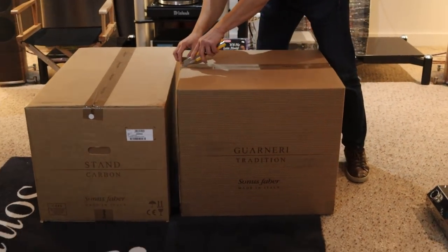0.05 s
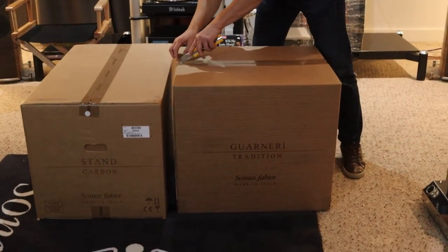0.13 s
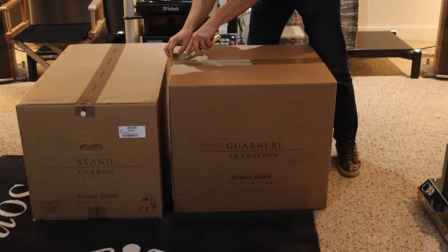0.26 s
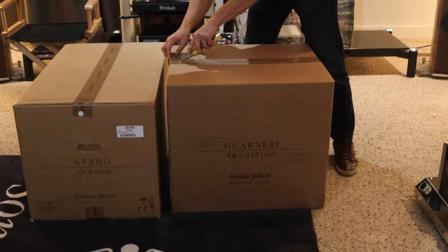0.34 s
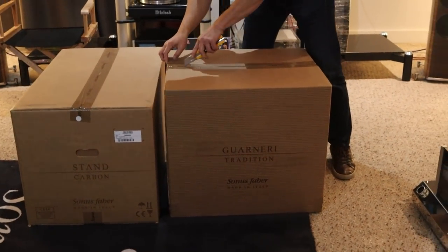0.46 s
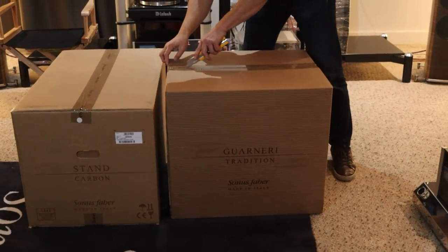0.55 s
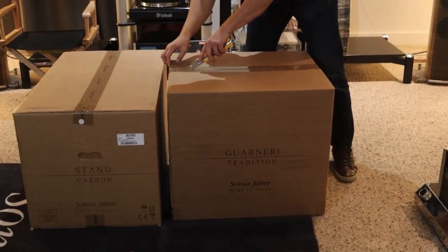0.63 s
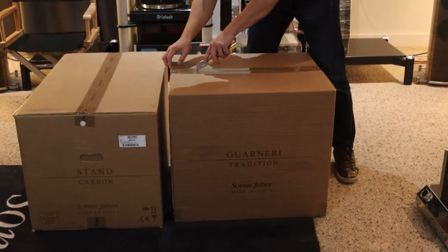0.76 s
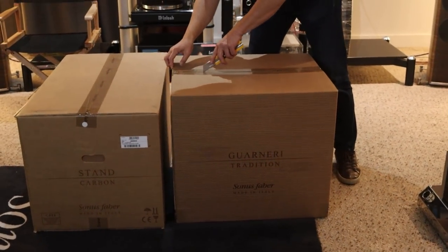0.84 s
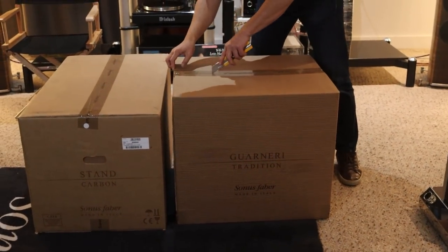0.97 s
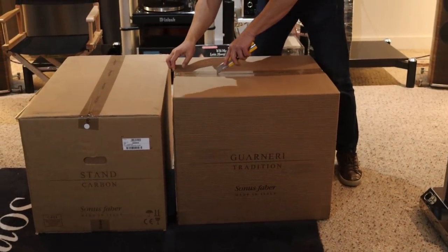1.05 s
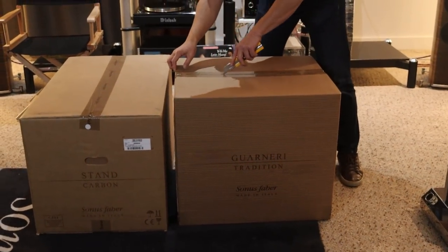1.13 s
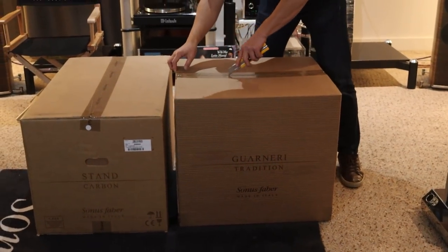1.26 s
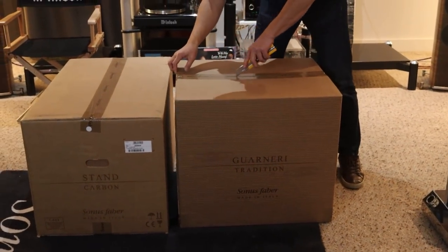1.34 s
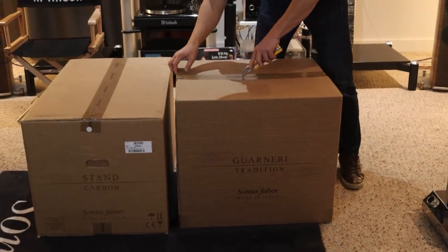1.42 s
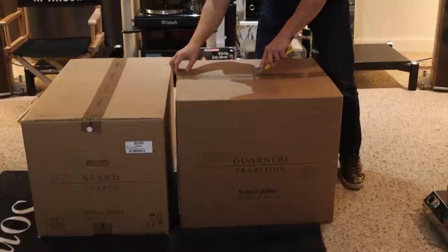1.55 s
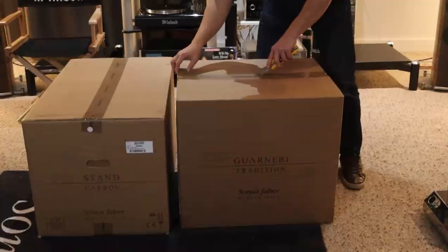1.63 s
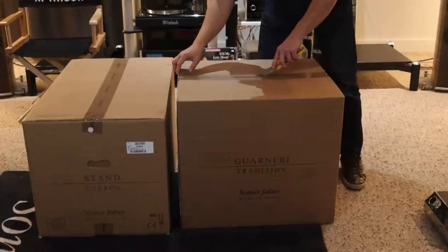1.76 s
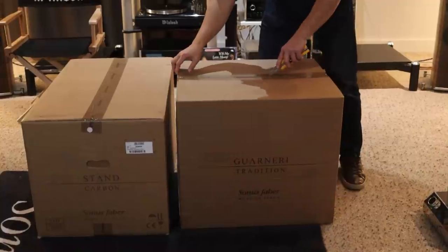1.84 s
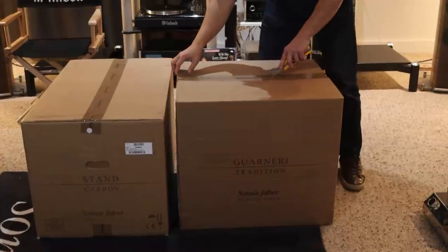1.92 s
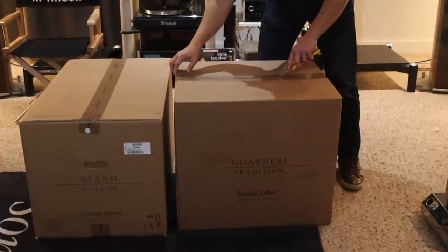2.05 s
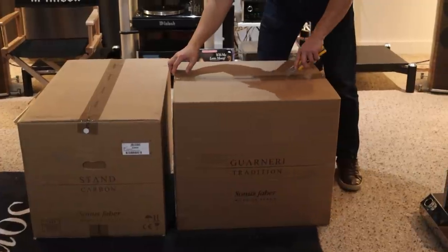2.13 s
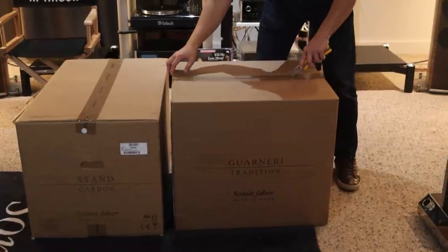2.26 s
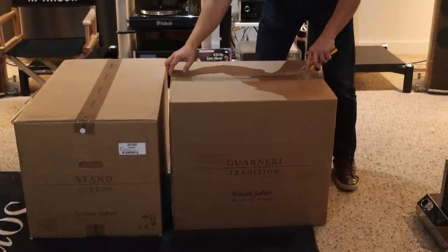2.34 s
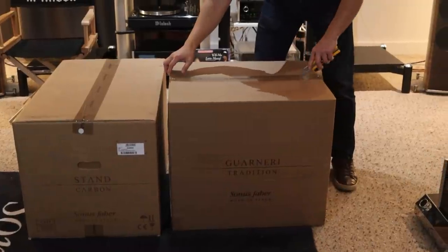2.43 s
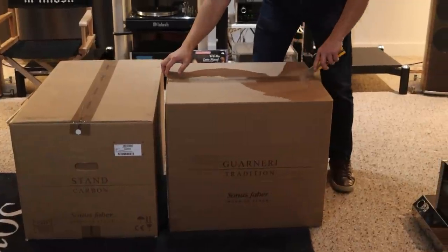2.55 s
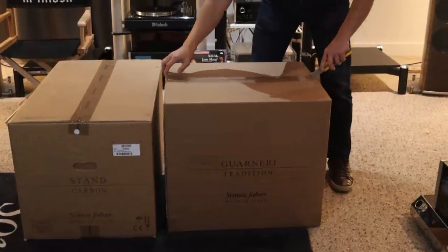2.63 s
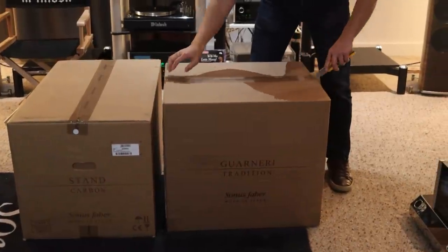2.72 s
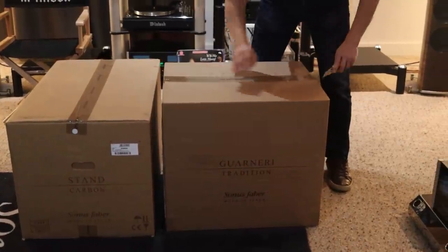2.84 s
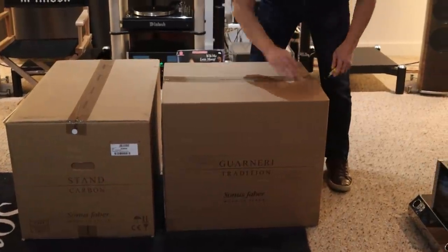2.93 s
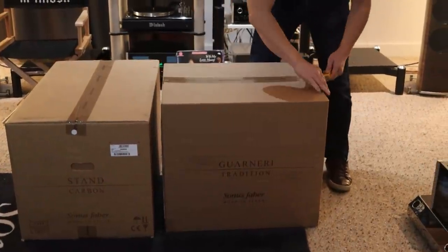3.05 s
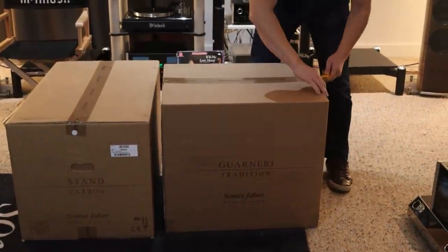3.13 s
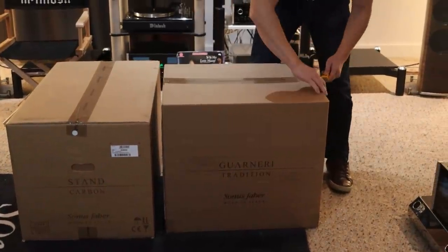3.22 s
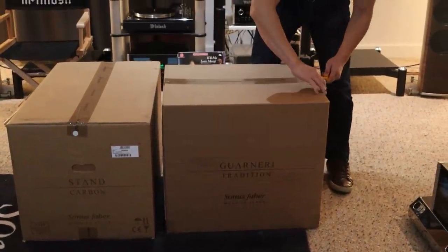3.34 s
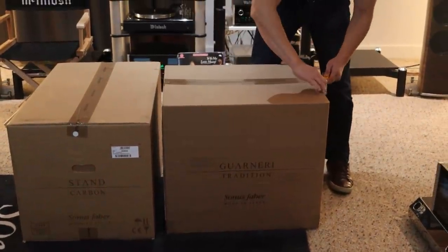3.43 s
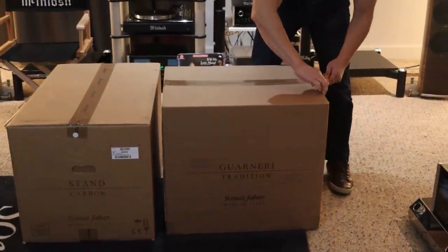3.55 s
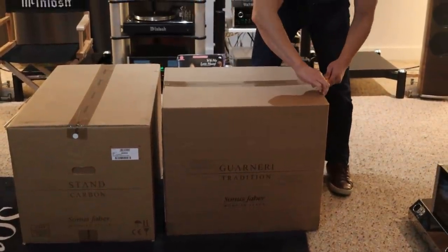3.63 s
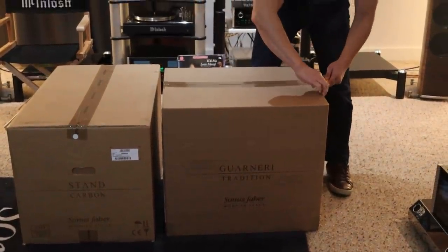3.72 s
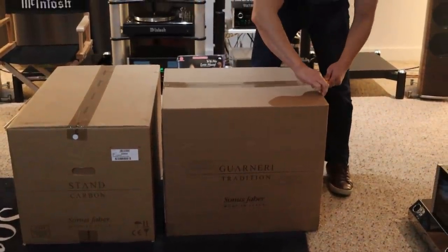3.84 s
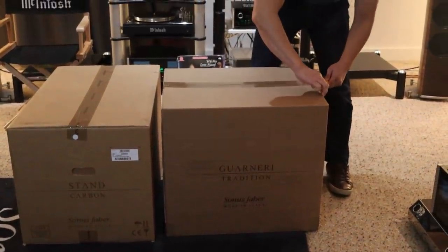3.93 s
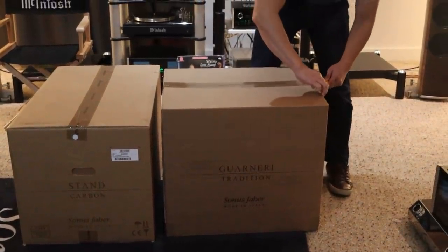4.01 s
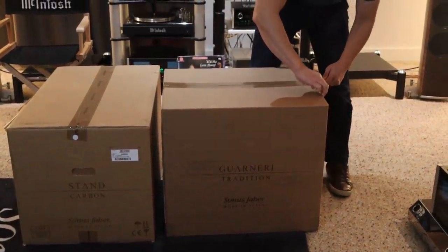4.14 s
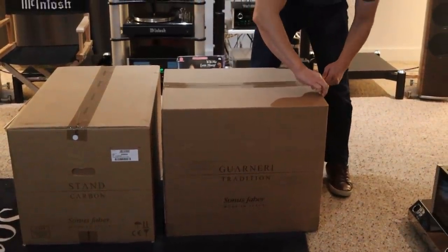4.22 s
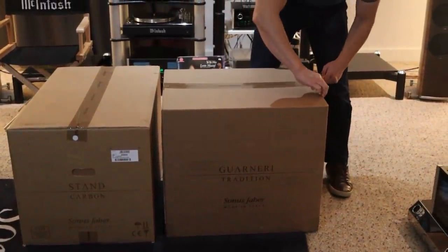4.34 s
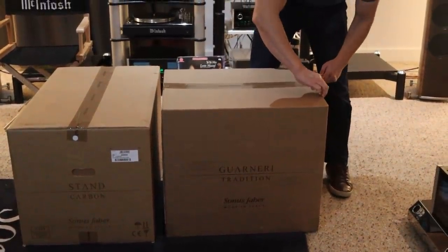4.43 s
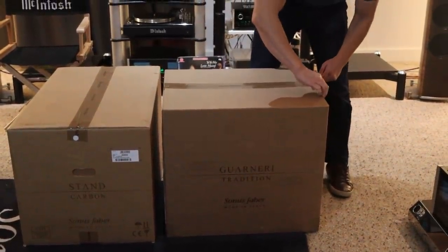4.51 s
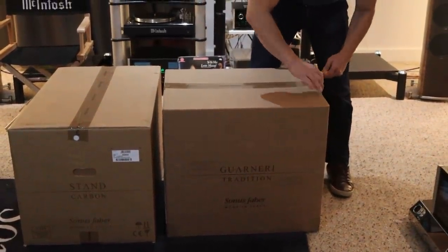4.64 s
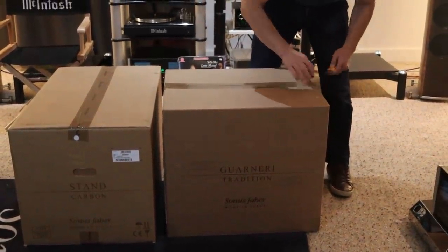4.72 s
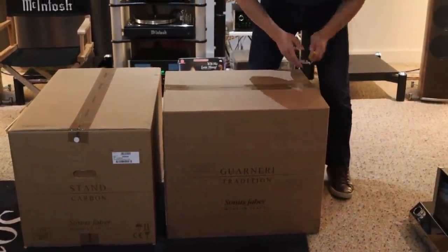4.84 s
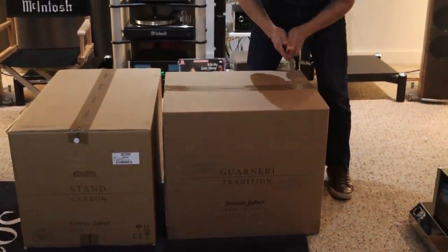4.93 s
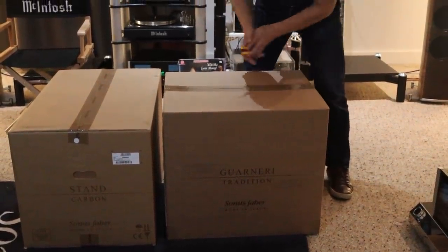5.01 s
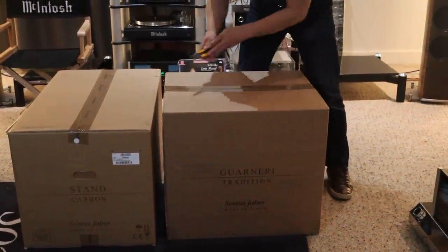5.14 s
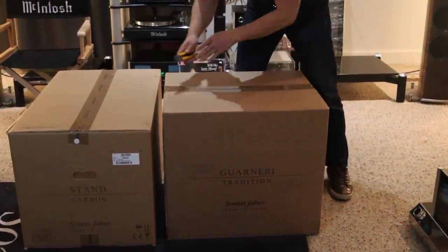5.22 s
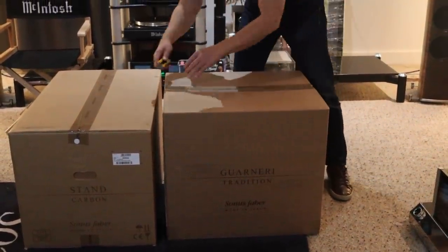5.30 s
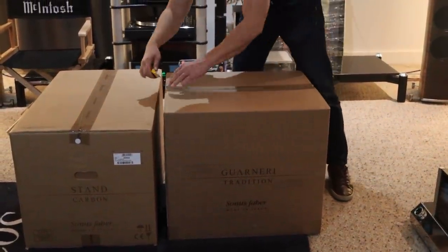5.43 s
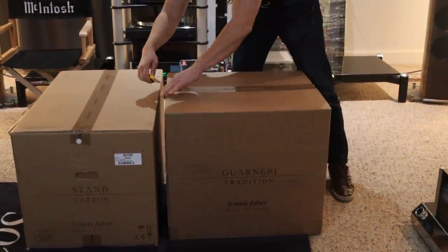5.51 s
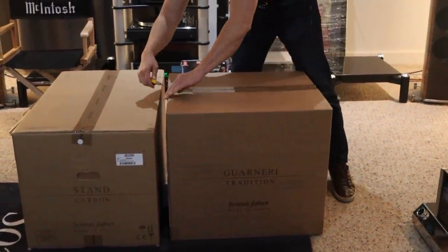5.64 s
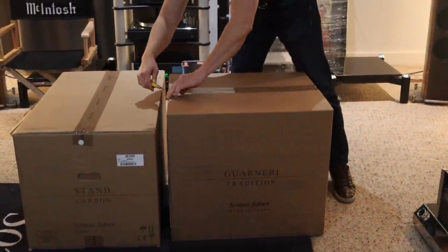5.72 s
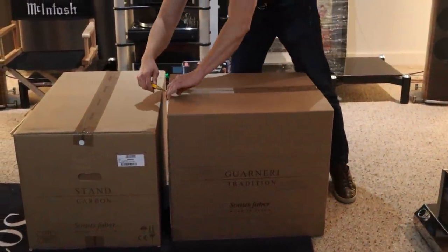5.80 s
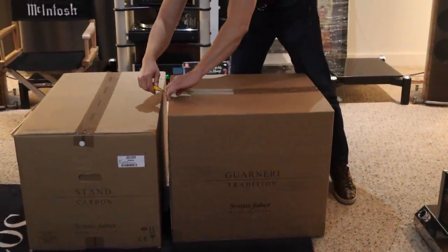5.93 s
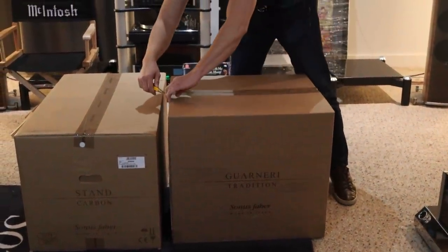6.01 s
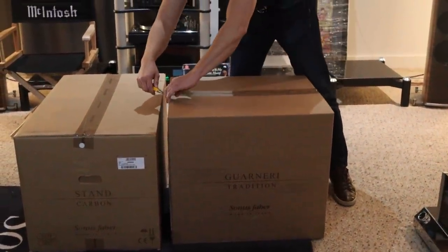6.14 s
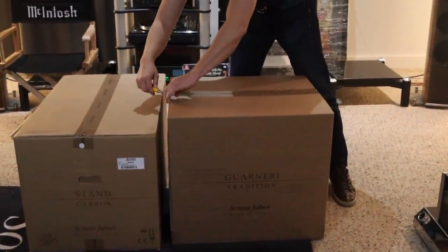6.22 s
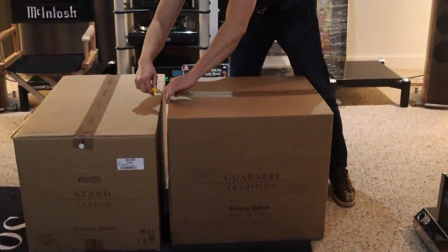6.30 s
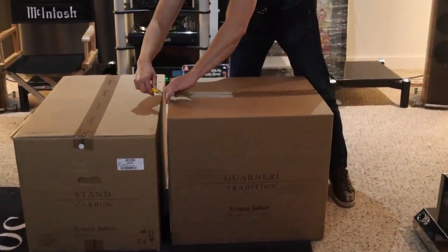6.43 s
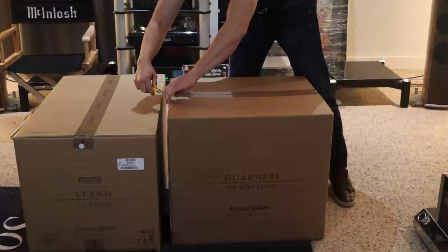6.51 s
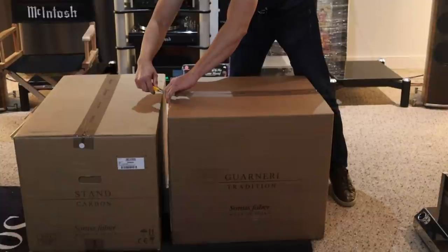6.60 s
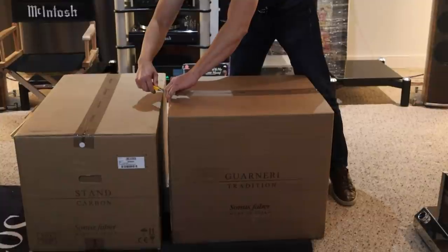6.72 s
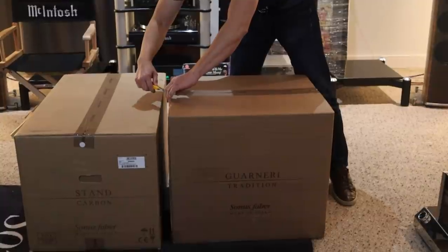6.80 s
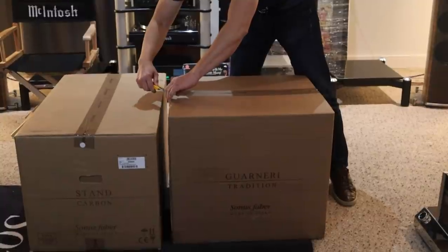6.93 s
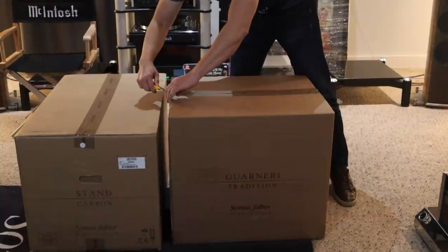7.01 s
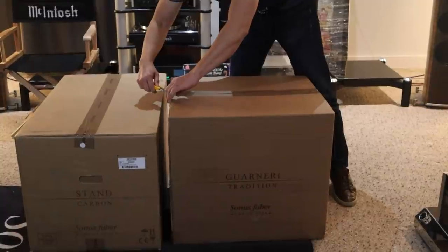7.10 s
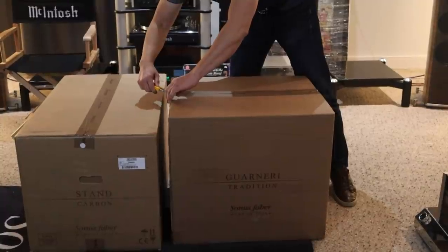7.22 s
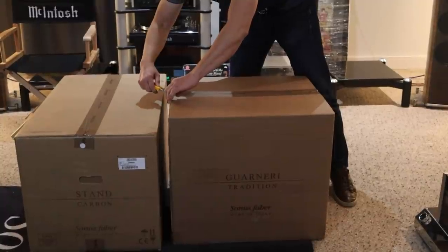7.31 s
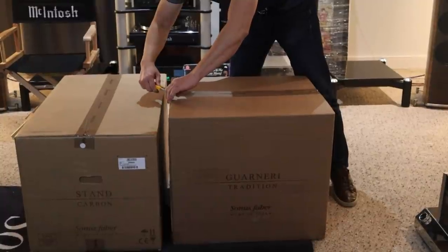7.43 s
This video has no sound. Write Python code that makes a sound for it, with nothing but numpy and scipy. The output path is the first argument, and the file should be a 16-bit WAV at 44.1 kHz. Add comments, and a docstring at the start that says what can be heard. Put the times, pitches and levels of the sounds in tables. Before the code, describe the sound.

Packing tape on a large cardboard box is cut with a scratchy knife stroke, followed by scattered snaps, pops and soft hand rubs.

```python
"""Hands rub softly over a big cardboard box, then a knife catches in its packing tape and slits it.
The blade sticks and slips along the seam, rasping and ticking, then picks at the tape on both edges.
Each slip and snap shakes the hollow box, its stiff panels, the tight tape and the blade's edge.
The top flap pops and drones under the hand; later the tape squeaks, fingers swish and the blade zips
over the rim. The room is carpeted, so echoes are short; faint air noise and mains hum lie underneath."""
import sys
import numpy as np
from scipy import signal
from scipy.fft import rfft, irfft
from scipy.io import wavfile
from scipy.ndimage import uniform_filter1d

SR = 44100
rng = np.random.default_rng(int(sys.argv[2]) if len(sys.argv) > 2 else 0)


def unload_audio(sound):
    """Save the sound as a 16-bit wav file, at the path given as the first command line argument."""
    columns = np.transpose(np.atleast_2d(sound))
    # keep every value between -1 and 1, then stretch to whole-number steps
    steps = np.round(np.clip(columns, -1, 1) * 32767)
    wavfile.write(sys.argv[1], SR, steps.astype(np.int16))


N = 328986

# Tone colour of the room's air: f/Hz, relative level/dB
AIR_COLOUR = [(30, -18), (60, -14), (90, -9), (125, 1.5), (180, -7), (260, -9), (400, -13.5), (1000, -17),
              (2000, -22.5), (5000, -23), (11500, -21.5), (12800, -15), (16000, -26)]

# A touch has a level, a depth (extra box and board, and a little extra tape) and a bite (extra treble).
# Hands slide over tape and board: loudest t/s, level/dB, depth/dB, bite/dB
HAND_RUBS = [(0.102, -55.5, -2, -27), (.185, -55, -3, -7), (.265, -61.5, -4, -32), (0.802, -65, 5, -14),
             (0.861, -56.5, 6.5, -13), (2.601, -51, -1.5, -3), (3.281, -59, -8.5, 5), (3.409, -75, 7.5, 6),
             (4.501, -45, -5, -19.5), (4.646, -46, -4, -11), (5.741, -51.5, 1, 3.5)]
# Short knife strokes: start t/s, length/s, level/dB, depth/dB, bite/dB
KNIFE_STROKES = [(0.414, 0.037, -39.5, 9, -15.5), (.46, 0.035, -44, 10, -12), (0.514, 0.092, -37.5, 4, -5),
                 (0.668, 0.018, -40.5, 6, -12), (2.439, 0.054, -42.5, 0, -5.5), (2.59, 0.042, -43, 1, -9),
                 (2.635, 0.06, -31.5, -3, -4.5), (2.729, 0.09, -43, 5, -6), (3.499, 0.058, -48.5, -3.5, -4),
                 (4.033, 0.02, -46, -20, -1.5), (4.246, 0.033, -34.5, -3.5, -4),
                 (4.419, 0.037, -38, -12, -6.5), (4.722, 0.021, -38, -2, 0.5), (6.459, 0.099, -48, 1.5, -5),
                 (6.584, 0.091, -44.5, 4, -11.5), (7.303, 0.019, -53.5, 6.5, -4),
                 (7.367, 0.028, -39, -2.5, -6), (7.425, 0.047, -41.5, -12, -18)]
# The long cut creeps, stalls, breaks loose and eases off: t/s, level/dB, depth/dB, bite/dB
SEAM_CUT = [(0.889, -40, -3.5, -11), (0.95, -41, -0.5, -17), (1.178, -41, -1, -14), (1.249, -53, 5, -10),
            (1.327, -54.5, 2, -12), (1.346, -41, 5.5, -12), (1.404, -35.5, 1.5, -11),
            (1.446, -28, 1.5, -15), (1.518, -27, -1, -12), (1.53, -22.5, -4.5, -18),
            (1.629, -21.5, -7, -10.5), (1.658, -31.5, 0, -18), (1.761, -32, -2, -2.5),
            (1.829, -36, 2.5, -33), (1.961, -38, 3, -3.5), (2.069, -39.5, -0.5, -19), (2.121, -35, 2.5, 1),
            (2.24, -35, -2.5, -13), (2.282, -38, 2, -10.5), (2.363, -35.5, -2, -4.5),
            (2.422, -50.5, 4, -25)]
# How much the blade stutters: t/s, share of the power in separate slips (0-1)
STUTTER_SHARE = [(.45, 0), (.57, 0.14), (.9, 0), (1.515, 0.11), (1.53, 0.5), (1.64, 0.52), (1.86, 0.74),
                 (1.92, 0.06), (2.15, 0.2), (2.33, 0.04), (2.6, 0.03)]
# The top flap gives, letting the box boom: t/s, boom against board/dB
FLAP_GIVE = [(.2, -8), (.56, -5.5), (.95, -26.5), (1.35, -9.5), (1.45, -6.5), (1.6, -15), (1.75, -8.5),
             (2.05, -14.5), (2.25, -22.5)]
# Tighter tape rings louder: t/s, boost/dB
TAPE_TIGHTNESS = [(.55, 1.5), (1.0, -4.5), (1.5, 2), (1.8, 3.5), (2.0, -1.5), (2.2, -8.5), (2.5, 0.5),
                  (3.2, 5.5), (3.55, 7.5), (4.6, 2), (5.7, -1), (6.6, 4), (7.4, -0.5)]

# Modes are the pitches a thing rings at; narrow ones ring longer. Each table: f/Hz, width/Hz, level/dB
HOLLOW_MODES = [(153, 11, 0.5), (194, 13, 10), (227, 12, -1)]   # the hollow box
PANEL_MODES = [(376.5, 18, -2), (402, 40, -9.5), (477, 36, -2), (561, 64, 3), (658, 60, -5),
               (736, 78, -5.5), (917, 54, -5), (1060, 70, -9), (1153, 60, -10.5), (1218.6, 30, -6.5),
               (1684, 530, -10.5)]   # its stiff panels
RIM_MODES = [(381, 33, 5.5), (483, 76, 3), (553, 49, 6), (728.4, 110, 4), (955, 230, 2), (1173, 20, 5),
             (1511, 200, -3.5)]   # its folded rim
FLAP_MODES = [(569.5, 31, 0)]   # the top flap under pressure
TAPE_MODES = [(2060, 130, 0.5), (2465, 40, 0), (2590, 90, 2.5), (2920, 120, -3), (3220, 170, -3.5),
              (3484, 690, -1), (4120, 1700, 5), (4840, 660, -0.5)]   # the tight tape
BLADE_MODES = [(5900, 2300, -0.5), (7540, 1600, 3), (8460, 810, -13), (11000, 560, -6), (13600, 2600, -15)]   # the blade's edge
SIZZLE_MODES = [(12000, 2200, 0), (13600, 1500, -4)]   # tape splitting at the blade
SLIP_MODES = [(2530, 140, 0.5), (3140, 300, -3), (5346, 2100, -1), (7000, 2100, -4.5)]   # a slip of the blade
TWANG_MODES = [(1849, 460, 3.5), (2450, 131, 5.5), (2860, 590, -4.5), (3400, 524, 0.5), (3730, 430, -6.5),
               (4070, 500, -23)]   # the last tight strip of tape
ZIP_MODES = [(1610, 39, 4), (2680, 166, -10), (3780, 160, -2), (4220, 200, -10.5), (4520, 110, 1),
             (6400, 260, -5), (7940, 190, 7), (9060, 930, 3), (10500, 800, 0), (11500, 600, -12)]   # tape parting at the rim

# Rough notes of rubbed box, board and tape: loudest t/s, spread/s, level/dB, first f/Hz, last f/Hz,
# width/Hz
RUBBING_NOTES = [(.428, 0.0076, -37, 6950, 6500, 1200), (1.03, 0.082, -46.5, 7040, 6850, 360),
                 (1.445, 0.019, -29.5, 8540, 6600, 1400), (1.55, .05, -31, 5400, 5300, 700),
                 (1.5, 0.06, -35.5, 2980, 3210, 410), (1.72, 0.12, -40.5, 2440, 2560, 277),
                 (2.0, 0.066, -48, 6800, 7300, 850), (2.15, 0.022, -34.5, 9100, 8600, 2230),
                 (2.23, 0.0197, -28.5, 8450, 7600, 1700), (2.22, 0.12, -46.5, 3800, 3740, 710),
                 (1.06, 0.0465, -43.5, 480, 390, 140), (1.819, 0.22, -42.5, 198, 180, 20),
                 (2.02, 0.1, -42.5, 1213, 1227, 50), (.182, 0.0095, -48, 500, 490, 70),
                 (.283, 0.027, -45.5, 520, 520, 130), (1.02, 0.12, -52.5, 2330, 2580, 450),
                 (1.14, 0.026, -43, 1200, 1000, 560), (1.385, .035, -36.5, 940, 1190, 350),
                 (2.645, 0.025, -32, 750, 680, 140), (2.64, 0.018, -39, 1220, 1190, 80),
                 (2.645, 0.016, -37, 2150, 2040, 350), (2.71, .016, -32, 2340, 2570, 500),
                 (4.064, 0.0032, -25, 9000, 7500, 2505), (4.068, 0.014, -41, 1296, 1106, 515),
                 (6.385, 0.011, -46, 292, 181, 180), (3.35, 0.0616, -67.5, 605, 516, 260),
                 (4.212, .01, -32, 2750, 2520, 640), (6.6, 0.057, -51.5, 3350, 3670, 170),
                 (6.73, 0.0131, -55, 5330, 5680, 870), (6.968, 0.0036, -33.5, 4300, 4360, 650),
                 (6.971, 0.0068, -39, 2186, 2153, 650)]
# The board gives under knife and hand: t/s, level/dB, first f/Hz, last f/Hz, time to fade 60 dB/s
BOARD_POPS = [(.216, -27, 345, 330, 0.086), (.35, -33, 201, 177, 0.24), (.32, -27.5, 75, 60, 0.1),
              (.337, -8, 581, 447, 0.079), (.432, -9, 604, 520, 0.083), (.437, -25, 228, 184.5, 0.28),
              (1.208, -36.5, 171, 149, 0.45), (1.687, -25, 200, 187, 0.25), (1.688, -17.5, 582, 560, 0.075),
              (1.725, -19.5, 590, 570, 0.083), (.345, -34, 315, 270, 0.054), (.44, -29, 330, 276, 0.14),
              (2.705, -14.5, 610, 570, 0.11), (2.715, -22, 400, 347, 0.11), (2.695, -15.5, 777, 740, 0.06),
              (2.69, -23, 236, 211, 0.17), (2.741, -13.5, 611, 497, .1), (2.764, -23, 379, 322, 0.1),
              (2.78, -28, 660, 605, 0.053), (.337, -26, 1247, 1221, 0.16), (2.7, -21.5, 1220, 1220, .16),
              (4.205, -31, 192, 163, 0.18), (4.746, -27, 622, 538, 0.086), (6.375, -26.5, 543, 450, 0.092),
              (6.968, -38, 440, 401, 0.11), (2.736, -24.5, 234.6, 212, 0.11), (3.648, -34, 576, 397, .12),
              (5.661, -32, 576, 528, 0.088), (4.2, -29, 776, 684, 0.063), (4.205, -24, 400, 363, 0.088),
              (4.235, -32, 118, 92, 0.13), (4.439, -36, 134, 83.9, 0.17), (4.75, -35.5, 169, 149.3, 0.23),
              (6.68, -36.5, 149.3, 93.6, 0.13), (6.98, -44, 139, 103.8, 0.24),
              (7.36, -43, 119.4, 85.8, 0.25)]
# The hand leans on the flap and lets up: heaviest t/s, level/dB, spread/s
HAND_PRESSES = [(.26, -61, 0.17), (.56, -34.5, 0.053), (.805, -45, 0.015), (.94, -41.5, 0.049),
                (1.49, -31, .025), (1.595, -24.5, .035), (1.76, -36.5, 0.063), (2.656, -30, 0.013),
                (2.74, -34.5, 0.03)]
# Catches, cuts and taps: t/s, crumbling time/s, level/dB, depth/dB, bite/dB
BLADE_SNAPS = [(.336, 0.013, -9.5, 11.5, -9), (.433, 0.0046, -9.5, 12, -22.5),
               (0.451, 0.0033, -37.5, 19, -19), (.593, 0.0019, -4.5, -1, -8), (0.8735, 0.0011, -3, -11, -8),
               (1.213, 0.0036, -12.5, 2.5, -12), (1.341, 0.0034, -20, 8.5, -12.5),
               (2.01, 0.0049, -8.5, -7, -17), (2.066, 0.004, -11, -2, -13), (2.351, .006, -8, -10, -12),
               (2.393, .005, -6, -7.5, -12), (2.48, 0.01, -11, -1.5, -11.5), (2.681, 0.011, -6, -1, -5.5),
               (2.699, 0.0094, 2, 7, -4.5), (2.709, 0.022, -6.5, 15, -8), (2.743, 0.011, -1, 1, -3),
               (2.826, 0.0028, -11.5, -4, -17), (3.186, 0.0092, -25.5, -46.5, -3),
               (3.508, 0.0064, -9, -3.5, -11), (3.646, 0.015, -18.5, 2.5, -2),
               (4.062, 0.0095, -4.5, -13.5, 0.5), (4.1976, 0.011, 2.5, 0.5, -8),
               (4.263, 0.0027, -9.5, 3, -13.5), (4.311, 0.0012, -8.5, -26, -8),
               (4.416, 0.0087, -6, -9.5, -27), (4.463, 0.0063, 0.5, -13.5, -26),
               (4.7448, 0.0032, -1.5, 0.5, -0.5), (5.661, 0.0057, -23, 14.5, -36),
               (6.372, 0.015, -2, -14, -3.5), (6.388, 0.017, -9.5, 3, -17), (6.965, 0.013, -6.5, -7.5, -13),
               (7.289, 0.0071, -23, 0.5, -11), (7.357, 0.015, -3, -11, -14)]
# The hardest single slips and cracks of the tape: t/s, energy/dB, f/Hz
TAPE_CRACKS = [(.434, -3.5, 5970), (.449, -7, 6350), (.5302, -11, 9000), (0.552, -8, 8500),
               (0.5668, -4, 8400), (0.571, -8, 8300), (0.585, -4, 8300), (0.5906, -5, 8000),
               (1.527, 2.5, 5800), (1.638, 1, 5700), (1.6847, -6, 5400), (1.6884, -3, 5400),
               (1.7195, -12, 5470), (1.7305, -20, 5700), (1.771, -16, 5400), (1.7812, -18, 5400),
               (1.775, -4, 5130), (1.848, -5.5, 5450), (1.861, -8.5, 5750), (1.8866, -2, 6100),
               (1.8893, -1.5, 6000), (1.8938, -6, 5840), (1.9024, -12, 5865), (2.239, -6, 7490),
               (2.3056, -9, 7100), (2.6827, -2, 8000), (2.709, 4, 7400), (2.7495, 0, 7900),
               (4.1974, 5, 6840), (4.1994, -9, 6500), (4.315, -9, 6300), (4.326, -6, 10100),
               (4.331, -8, 10500), (6.373, 4, 7460), (6.5803, -16, 7550)]
# Short squeaks on the tape, and one steady ring of the box:
# t/s, level/dB, first f/Hz, last f/Hz, time to fade 60 dB/s
SQUEAKS_AND_RING = [(3.139, -57, 2050, 1780, 0.05), (3.828, -49.5, 820, 725, 0.056),
                    (5.468, -59, 1745, 1587, 0.084), (6.62, -39.5, 1220, 1223, 0.24)]
# Fingertips skim the tape: loudest t/s, spread/s, level/dB, lowest f/Hz, highest f/Hz
FINGER_SWISHES = [(3.283, 0.025, -46, 3270, 9800), (3.39, 0.023, -52.5, 3216, 9900),
                  (3.22, 0.018, -54.5, 3400, 9300), (4.645, 0.037, -51, 2900, 9700),
                  (5.736, 0.0093, -52, 6990, 12150), (7.131, 0.0073, -54, 6280, 10360)]
# The blade crosses the ribs at the rim: t/s, energy/dB
RIM_ZIPS = [(6.47, -9.5), (6.5, -9.5), (6.523, -17), (6.556, -11), (6.568, -9.5), (6.585, -3),
            (6.612, -3.5), (6.636, -4.5), (6.656, -5), (6.667, -5.5)]

RIM_FROM_S = 3   # after the long cut, the blade works on the rim


def from_db(db):
    """Turn decibels into a number to multiply by."""
    return 10 ** (np.asarray(db) / 20)


def unit_energy(x):
    """Scale so the squares add up to 1."""
    return x / np.sqrt(np.sum(x ** 2) + 1e-20)


def rms_one(x):
    """Scale so the squares average 1."""
    return unit_energy(x) * np.sqrt(len(x))


def seconds(size):
    """The time of each sample."""
    return np.arange(size) / SR


def in_time(rows):
    """Join a table's points into one curve per column after the time."""
    times, *columns = np.transpose(rows)
    return [np.interp(seconds(N), times, column) for column in columns]


def bell(t, spread):
    """A smooth swell and fade, highest at t = 0."""
    return np.exp(-.5 * (t / spread) ** 2)


def add(out, s, sound):
    """Mix a sound in at time s."""
    start = int(s * SR)
    sound, start = sound[max(-start, 0):], max(start, 0)
    out[start:start + len(sound)] += sound[:N - start]


def cut(x, kind, hz, order):
    """Filter a sound; kind says what stays: "low", "high" or "band"."""
    return signal.sosfilt(signal.butter(order, hz, kind, fs=SR, output="sos"), x)


def band(x, low_hz, high_hz, order=2):
    """Keep what lies between two pitches."""
    return cut(x, "band", [low_hz, high_hz], order)


def drift(per_s):
    """A random, wandering curve of typical size 1."""
    points = rng.standard_normal(N // 20)
    return rms_one(np.interp(seconds(N) * per_s, np.arange(len(points)), points))


def steady(x, span_s=0.029):
    """Even out the loudness but keep the grain."""
    power = uniform_filter1d(x ** 2, int(span_s * SR))
    return x / np.sqrt(np.maximum(power, 1e-3 * np.mean(x ** 2)))


def background(air_db=-69, hum_db=-74, hum_hz=120):
    """Faint room air and mains hum, there from the start."""
    pitches, levels = np.transpose(AIR_COLOUR)
    edges = np.geomspace(25, 18000, 20)   # half an octave apart
    air = 0
    for low, high in zip(edges, edges[1:]):
        db = np.interp(np.log(np.sqrt(low * high)), np.log(pitches), levels)
        air += from_db(db) * band(rng.standard_normal(N), low, high)
    hum = np.sin(2 * np.pi * hum_hz * seconds(N))
    return from_db(air_db) * rms_one(air) + from_db(hum_db) * rms_one(hum)


def ring(modes, low_hz, high_hz, shift=1, scatter_db=0):
    """What one click sets ringing; where it lands shifts the pitches and their levels."""
    t, out = seconds(6000), 0
    for (hz, width, db), chance in zip(modes, rng.standard_normal(len(modes))):
        fade = width * from_db(db + scatter_db * chance) * np.exp(-np.pi * width * t)
        out += fade * np.cos(2 * np.pi * hz * shift * t)
    return unit_energy(band(out, low_hz, high_hz))


def part_rings(board_modes, tape_modes=TAPE_MODES, shift=1, scatter_db=0):
    """How five parts answer a click: hollow box, board, tape, blade and treble bite."""
    blade = ring(BLADE_MODES, 4670, 9700, shift, scatter_db)
    sizzle = np.roll(ring(SIZZLE_MODES, 10500, 15000), 9)   # the tape splits just after the blade moves
    return [ring(HOLLOW_MODES, 133, 227, shift, scatter_db),
            ring(board_modes, 392, 1690, shift, scatter_db),
            ring(tape_modes, 2170, 4900, shift, scatter_db),
            cut(blade, "low", 9800, order=8),
            unit_energy(cut(blade + from_db(-19.5) * sizzle, "high", 9800, order=8))]


def part_gains(level, depth, bite, boom_db, tape_db):
    """How a touch shares its force among the same five parts."""
    return [from_db(level + db) for db in (depth + boom_db, depth, tape_db + 0.32 * depth, 0, bite)]


def shake(force, parts):
    """Let a force shake several parts, each a pair of gain curve and ring."""
    return sum(signal.oaconvolve(force * gain, ringing)[:N] for gain, ringing in parts)


def touch(rise_db_per_s=1001.5, fall_db_per_s=700, rub_db_per_s=223.5):
    """Level, depth and bite over time, from the strongest of long cut, stroke and rub."""
    t = seconds(N)

    def fade_db(start, end):
        return -np.maximum(np.maximum(rise_db_per_s * (start - t), fall_db_per_s * (t - end)), 0)

    level, depth, bite = in_time(SEAM_CUT)
    level += fade_db(SEAM_CUT[0][0], SEAM_CUT[-1][0])
    moves = [(db + fade_db(s, s + length), *tone) for s, length, db, *tone in KNIFE_STROKES]
    moves += [(db - rub_db_per_s * np.abs(t - s), *tone) for s, db, *tone in HAND_RUBS]
    for own_level, own_depth, own_bite in moves:
        wins = own_level > level
        level[wins], depth[wins], bite[wins] = own_level[wins], own_depth, own_bite
    return [uniform_filter1d(curve, size=200) for curve in (level, depth, bite)]


def fibres(per_s, spread_db):
    """Countless tiny fibre breaks of uneven size."""
    sizes = from_db(spread_db * np.minimum(rng.exponential(1, N), 4))
    signs = rng.choice([-1, 1], N)
    return rms_one(sizes * signs * (rng.random(N) < per_s / SR))


def slips(level, middle_db=-32.5, doubling_db=60.5):
    """The blade sticks, stretches the tape and lets go; a harder pull slips more often."""
    per_s = np.maximum(215 * 2 ** ((level - middle_db) / doubling_db), 180)
    gaps, sizes = rng.standard_normal((2, 8000))
    due = np.cumsum(np.exp(.3 * gaps))   # unevenly spaced
    at = np.searchsorted(np.cumsum(per_s) / SR, due)
    out = np.zeros(N)
    out[at[at < N]] = from_db(2 * sizes[at < N])
    return rms_one(out / np.sqrt(per_s))


def dragging(ribs_per_s=35, rib_db=1.44, waver_db=1.13):
    """Hands and blade drag; fibre breaks and slips shake the box, giving a rasp and sharp ticks."""
    level, depth, bite = touch()
    # The blade bumps over the cardboard's ribs, and the pull is never quite even.
    rib_rate = ribs_per_s * (1 + .2 * drift(per_s=15))
    level += rib_db * np.sin(2 * np.pi * np.cumsum(rib_rate) / SR)
    level += waver_db * np.tanh(drift(per_s=45))
    share = np.clip(in_time(STUTTER_SHARE)[0], 0, 1)
    grit = np.sqrt(1 - share) * steady(fibres(per_s=7000, spread_db=3.5))
    grit *= steady(from_db(3.3 * drift(per_s=150)), span_s=0.033)
    stutter = np.sqrt(share) * steady(slips(level))
    boom, board, tape, blade, treble = part_gains(
        level, depth, bite, boom_db=in_time(FLAP_GIVE)[0], tape_db=in_time(TAPE_TIGHTNESS)[0] - 3)
    box_ring, panel_ring, tape_ring, blade_ring, treble_ring = part_rings(PANEL_MODES)
    rim_ring = part_rings(RIM_MODES)[1]
    slip_ring = ring(SLIP_MODES, 2320, 9710)
    on_rim = seconds(N) > RIM_FROM_S
    low_parts = [(boom, box_ring), (board * ~on_rim, panel_ring), (board * on_rim, rim_ring)]
    high_parts = [(tape, tape_ring), (blade, blade_ring), (treble, treble_ring)]
    rasp = shake(grit + stutter, low_parts) + shake(grit, high_parts)
    ticks = shake(stutter, [(np.hypot(tape, blade), slip_ring), (from_db(-5) * treble, treble_ring)])
    return from_db(-2.5) * rasp, from_db(-2.5) * ticks


def rubbing_notes(size=24000):
    """Rubbing by hand or blade makes box, board and tape ring with rough, gliding notes."""
    out, t = np.zeros(N), seconds(size) - size / SR / 2
    for s, spread, db, first_hz, last_hz, width_hz in RUBBING_NOTES:
        hz = np.interp(t, [-2 * spread, 2 * spread], [first_hz, last_hz])
        noise = cut(rng.standard_normal((2, size)), "low", width_hz / 2, order=2)
        glide = np.exp(2j * np.pi * np.cumsum(hz) / SR)
        note = np.real((noise[0] + 1j * noise[1]) * glide)   # moves the noise up to the pitch
        add(out, s + t[0], from_db(db) * bell(t, spread) * rms_one(note))
    return out


def surface_notes(rows, sag_s, rise_cycles, creasing):
    """A stretched surface rings, sinking in pitch if it slackens; creasing makes the note uneven."""
    out, t = np.zeros(N), seconds(16000)
    for s, db, first_hz, last_hz, fade_s in rows:
        cycles = np.cumsum(last_hz + (first_hz - last_hz) * np.exp(-t / sag_s)) / SR
        wobble, flutter = (creasing * np.interp(cycles / 2, np.arange(600), points)
                           for points in rng.standard_normal((2, 600)))
        phase = 2 * np.pi * cycles + 2 * wobble
        note = np.sin(phase) + from_db(-23) * np.sin(2 * phase)
        rise = 1 - np.exp(-t * first_hz / rise_cycles)
        add(out, s, from_db(db - 60 * t / fade_s) * rise * (1 + flutter) * note)
    return out


def droning():
    """The dragging blade keeps the flap ringing on one note while the hand leans on it."""
    shaking = signal.oaconvolve(fibres(per_s=1200, spread_db=1.5), ring(FLAP_MODES, 473, 705))[:N]
    pressure = sum(from_db(db) * bell(seconds(N) - s, spread) for s, db, spread in HAND_PRESSES)
    return pressure * steady(shaking, span_s=0.034)


def flatten(x):
    """Make all pitches about equally strong without blurring the start (a minimum-phase filter)."""
    power = uniform_filter1d(np.abs(rfft(x)) ** 2, size=24)
    cepstrum = irfft(np.log(power + 1e-9) / 2)
    cepstrum[1:len(x) // 2] *= 2
    cepstrum[len(x) // 2 + 1:] = 0
    return irfft(rfft(x) * np.exp(-rfft(cepstrum)))


def crumble(fade_s, lead_s, creak_db, grain_db=4.5, size=4000):
    """Fibres creak under load, then one break sets off a dying shower of smaller ones."""
    t = seconds(size) - lead_s
    shower = rng.standard_normal(size) * from_db(grain_db * rng.standard_normal(size))
    shower *= rng.random(size) < .25
    shower[np.argmax(t >= 0)] = 2.2   # the main break
    shower *= np.exp(-np.abs(t) / fade_s)
    creak = unit_energy(shower * (t < 0) * (1 + t / lead_s) ** 2)
    breaking = unit_energy(flatten(shower * (t >= 0)))
    return from_db(creak_db) * (fade_s / lead_s) ** 2 * creak + breaking


def snapping(lead_s=.025, flex_s=0.0043, twang_at_s=4.745, twang_db=15.5):
    """Each catch of the blade strikes the box in a slightly different place."""
    out = np.zeros(N)
    for s, crumble_s, level, depth, bite in BLADE_SNAPS:
        creak_db = -7.5 - 0.87 * max(level, -5)   # less creak before a hard snap
        slow = crumble(crumble_s + flex_s, lead_s, creak_db)   # the board bends on after the tape parts
        quick = crumble(crumble_s, lead_s, creak_db)
        board_modes = RIM_MODES if s > RIM_FROM_S else PANEL_MODES
        twangs = abs(s - twang_at_s) < lead_s   # the last tight strip parts at the corner
        tape_modes, boost_db = (TWANG_MODES, twang_db) if twangs else (TAPE_MODES, 0)
        shift = np.exp(.015 * rng.standard_normal())
        rings = part_rings(board_modes, tape_modes, shift, scatter_db=1.2)
        tight_db = np.interp(s, *np.transpose(TAPE_TIGHTNESS))
        gains = part_gains(level, depth, bite, boom_db=-15, tape_db=tight_db + boost_db - 3.5)
        for gain, ringing, force in zip(gains, rings, (slow, slow, quick, quick, quick)):
            add(out, s - lead_s, gain * unit_energy(signal.fftconvolve(force, ringing)))
    return out


def cracking(pitch_span=1.364):
    """The tape gives way all at once with a dry tick."""
    out = np.zeros(N)
    for s, db, hz in TAPE_CRACKS:
        tick = band(signal.unit_impulse(256), hz / pitch_span, hz * pitch_span, order=3)
        add(out, s, from_db(db) * unit_energy(tick))
    return out


def swishing(size=12000):
    """A fingertip skims the smooth tape with a bright hiss."""
    out, t = np.zeros(N), seconds(size) - size / SR / 2
    for s, spread, db, low_hz, high_hz in FINGER_SWISHES:
        bright_noise = signal.lfilter([1, -.7], [1], rng.standard_normal(size))
        hiss = band(bright_noise, low_hz, high_hz, order=8)
        add(out, s + t[0], from_db(db) * bell(t, spread) * rms_one(hiss))
    return out


def zipping(rise_s=0.0045, fall_s=0.0036, size=3000):
    """At each rib of the rim the tape parts with a soft, bright zip."""
    out, t = np.zeros(N), seconds(size) - size / SR / 2
    swell = np.exp(np.minimum(t / rise_s, -t / fall_s))
    ringing = ring(ZIP_MODES, 1300, 11800)
    for s, db in RIM_ZIPS:
        tear = swell * rng.standard_normal(size)
        add(out, s + t[0], from_db(db) * unit_energy(signal.fftconvolve(tear, ringing)))
    return out


def room(x, echo_db, low_fade_s=0.19, high_fade_s=0.17, build_s=0.00027, block=6000):
    """The direct sound plus a short wash of echoes whose pattern changes as the hands move."""
    t, echoes = seconds(13000), np.zeros(N)
    for start in range(0, N, block):
        noise = rng.standard_normal(len(t))
        low = cut(noise, "low", 1500, order=1)
        tail = low * from_db(-60 * t / low_fade_s) + (noise - low) * from_db(-60 * t / high_fade_s)
        tail *= 1 - np.exp(-t / build_s)
        add(echoes, start / SR, signal.fftconvolve(x[start:start + block], unit_energy(tail)))
    gain = from_db(echo_db)
    return (x + gain * echoes) / np.sqrt(1 + gain ** 2)


def scene():
    """The work on the box, heard from across the room."""
    rasp, ticks = dragging()
    friction = rasp + zipping() + rubbing_notes() + swishing()
    squeaks_and_ring = surface_notes(SQUEAKS_AND_RING, sag_s=0.0047, rise_cycles=0.8, creasing=0.26)
    cutting = room(friction + squeaks_and_ring + snapping(), echo_db=-3.5)
    clicks = room(ticks + cracking(), echo_db=-10)
    pops = surface_notes(BOARD_POPS, sag_s=0.024, rise_cycles=1.1, creasing=.25)
    flap = room(pops + droning(), echo_db=-5.5)
    return (cutting + clicks + flap + background())[None]


def record(dry, bass_hz=50, top_hz=16100):
    """Round off the tallest peaks, then cut the deep bass and the very top."""
    rounded = cut(np.tanh(dry), "high", bass_hz, order=5)
    return signal.sosfilt(signal.ellip(10, .1, 80, top_hz, fs=SR, output="sos"), rounded)


dry = scene()
out = record(dry)
unload_audio(out)
```